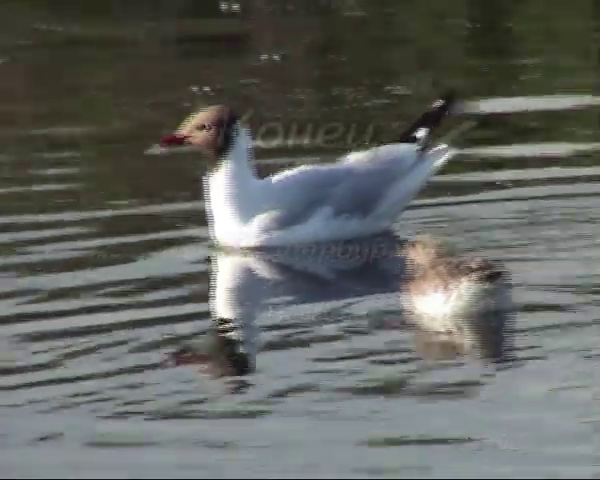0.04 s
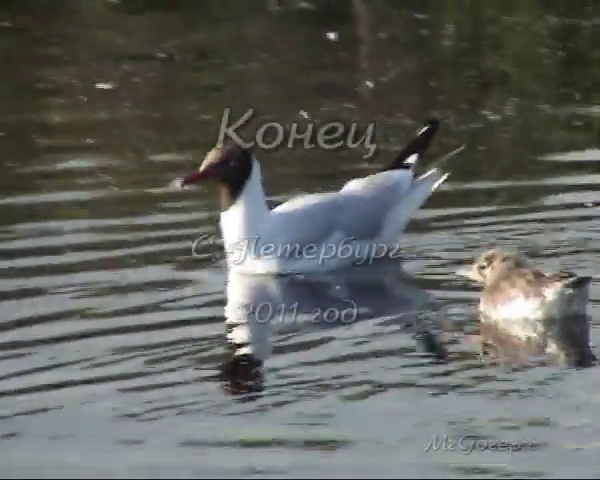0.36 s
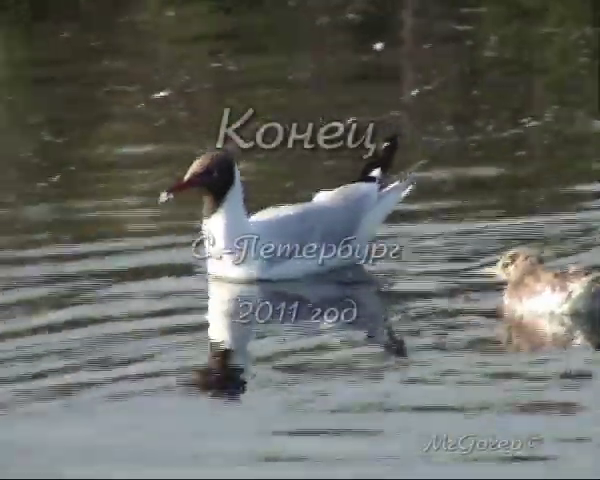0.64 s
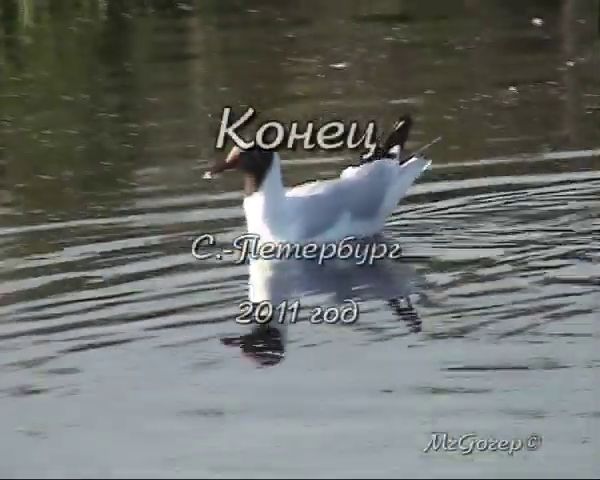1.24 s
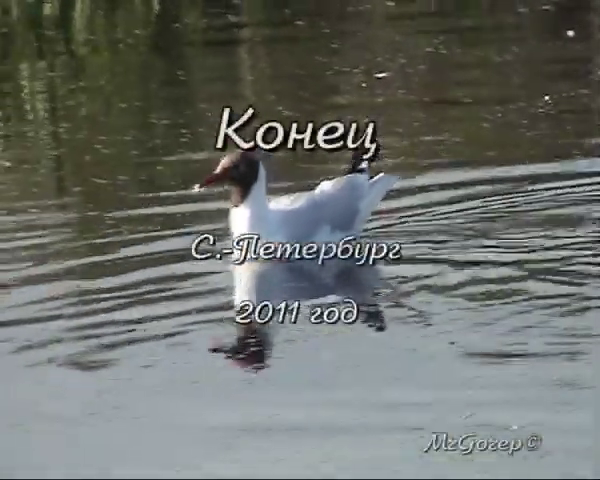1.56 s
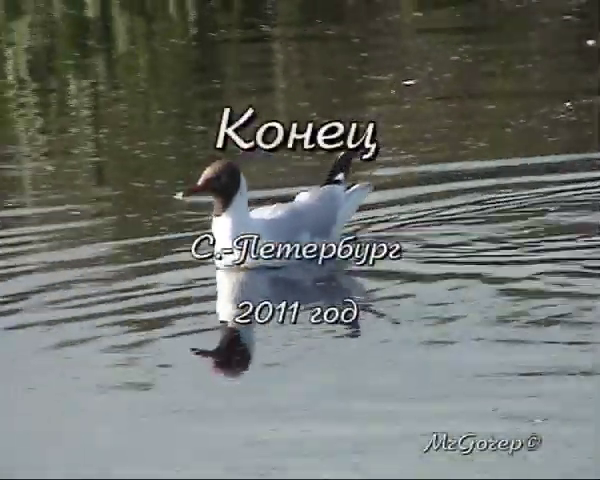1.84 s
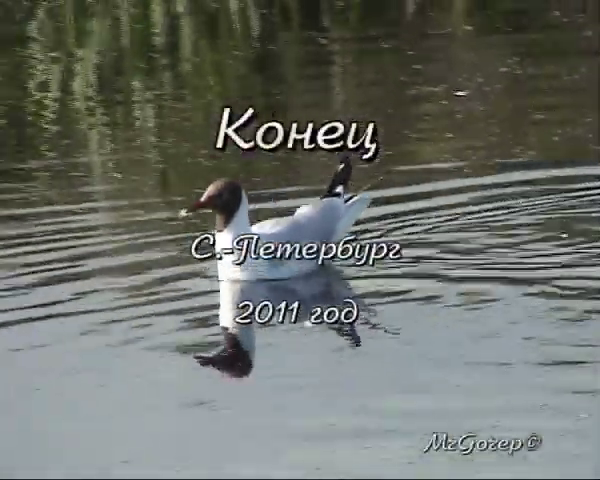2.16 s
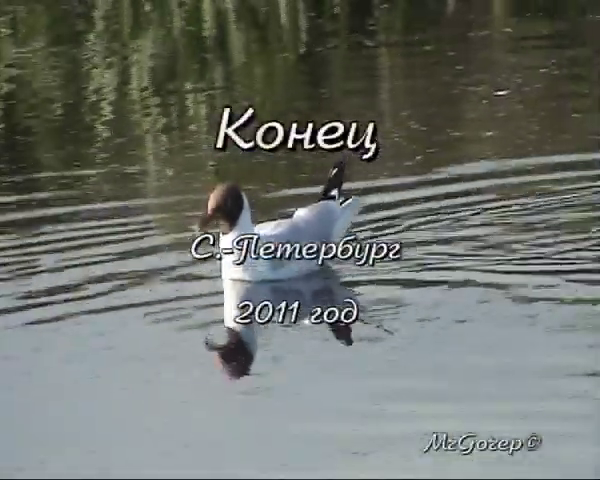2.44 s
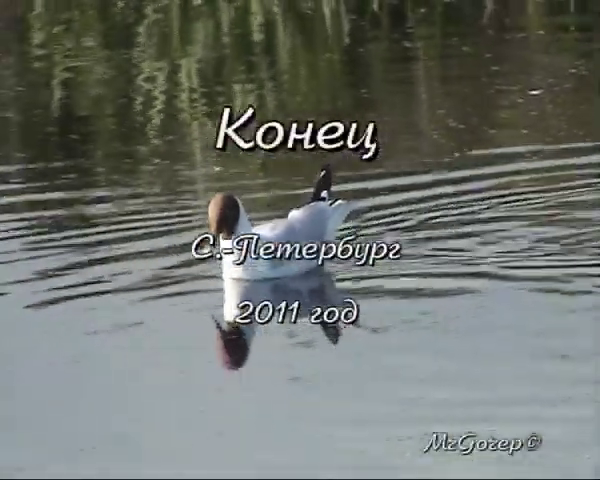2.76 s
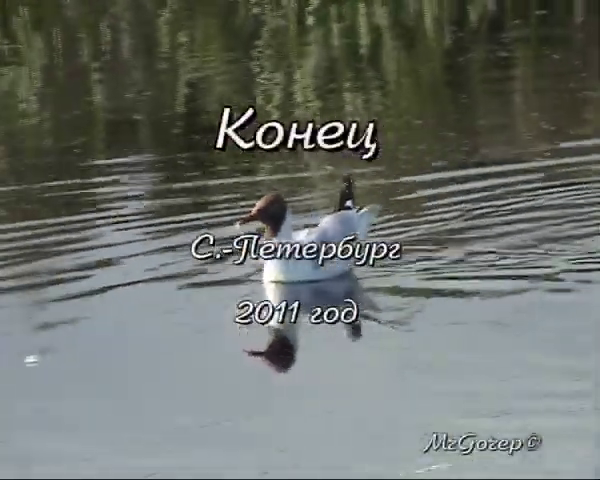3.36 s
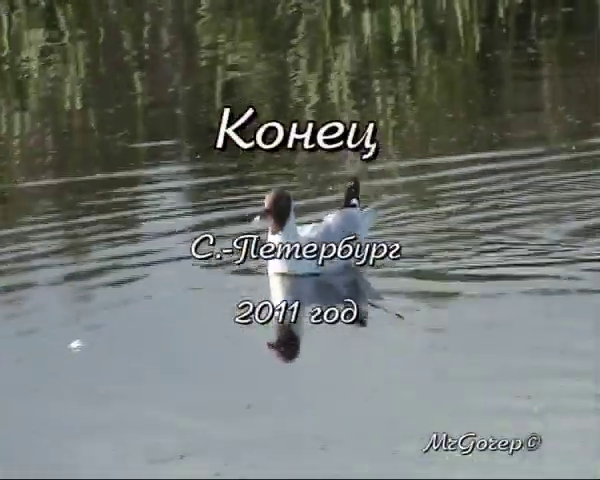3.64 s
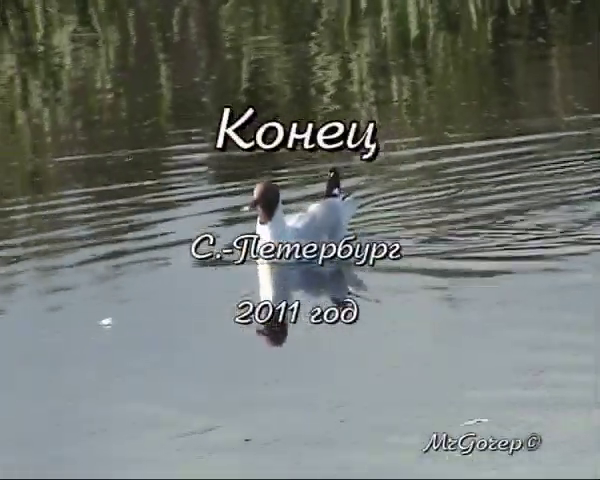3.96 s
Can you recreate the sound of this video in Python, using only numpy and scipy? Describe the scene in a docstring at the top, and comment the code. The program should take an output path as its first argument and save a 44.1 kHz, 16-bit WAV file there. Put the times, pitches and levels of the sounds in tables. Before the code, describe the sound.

Gull chicks whistle shrilly over and over while adult gulls give harsh, rattling cries.

```python
"""Gull chicks on a lake, close to a stereo microphone, beg again and again in shaky, nearly pure whistles.
Around them adults give rattling cries and yelps: harmonics and rasp, shaped by the throat and chopped
into fast beats. The calls echo off reeds and banks. Far behind lie the blur of a colony and a low rumble,
with a little splashing, thin hiss, a hum and the camera's whine; one sharp tick comes near the end."""
import sys
import numpy as np
from scipy import signal
from scipy.fft import rfft, irfft, next_fast_len
from scipy.io import wavfile
from scipy.ndimage import uniform_filter1d

SR = 44100
rng = np.random.default_rng(int(sys.argv[2]) if len(sys.argv) > 2 else 0)


def persist_wave(psi):
    """Save psi, clipped to +-1, as 16-bit WAV."""
    counts = np.round(np.clip(psi, -1, 1) * 32767).astype(np.int16)
    wavfile.write(sys.argv[1], SR, np.atleast_2d(counts).T)


N = 176400

# spectra of the distant colony, the rumble and the high hiss: (frequency [Hz], relative density [dB])
COLONY_SPECTRUM = [(180, -48), (300, -12), (476, -7.5), (667, -5), (737, -4.5), (825, -3), (1090, -4),
                   (1180, -2.5), (1500, 1.5), (1860, 1), (2380, -4), (3140, -8.5), (4450, -6), (5040, -8.5),
                   (5930, -17.5), (7710, -43), (13000, -120)]
RUMBLE_SPECTRUM = [(12, -50), (20, -21), (54, -3.5), (75, -0.5), (114, -0.5), (166, -10), (214, -7.5),
                   (296, -18.5), (400, -16.5), (520, -22), (880, -120)]
HISS_SPECTRUM = [(4000,-38),(5500,-10),(6800,-1.5),(8000,2),(9000,-6.5),(10500,-9),(13000,-23.5),(15500,-36)]
# how alike the ambience is at the two microphone ports: (frequency [Hz], coherence [0-1])
PORT_COHERENCE = [(60, 0.95), (110, 1), (220, 0.98), (420, 0.8), (790, 0.62), (1510, 0.3), (2880, 0.71),
                  (5480, 0.52)]
# the side the ambience leans to: (frequency [Hz], left minus right [dB])
PORT_BALANCE = [(60, -1), (110, -0.5), (220, 0.5), (420, 3), (790, -2.5), (1510, -2), (2880, -6.5),
                (5480, 0.0)]
# how far the left port leads: (frequency [Hz], phase [rad])
PORT_PHASE = [(0, 0), (600, -0.63), (860, 0.0017), (1550, -0.91), (2580, 0.82), (4050, -0.66), (5250, 0.7),
              (5680, 0.36)]
# thin whine of the camera: (frequency [Hz], level [dB])
CAMERA_WHINE = [(6223,-73),(7273,-75),(7727,-67),(8182,-75),(9900,-83)]

# adult cries, near and far: (time [s], length [s], rise [s], top pitch [Hz], end pitch [Hz], level [dB],
# rattle [beats/s], left minus right [dB], treble [dB], roughness [0-1])
NEAR_CRIES = [(-.08,0.12,0.078,882,690,-20.5,79,-1.5,5.5,0.3),(.655,0.25,0.056,1014,888,-26,83,-6.5,2,0.13),(1.745,0.27,0.039,1012,890,-26,76,-6,-2,.15),(2.255,0.32,0.093,1028,901,-26,87,2,-5.5,0.35),(2.89,.085,0.0304,1025,990,-27,67,-4,-15,.1),(3.065,.38,0.0196,1002,838,-25,68,3,-8,0.22),(3.965,.2,0.055,905,800,-26.5,68,3,-10,.1)]
FAR_CRIES = [(.05,0.16,0.044,861,797,-31,69.8,-6.5,2,0.78),(.67,0.33,0.031,852,765,-33.5,74.5,-13,3,.25),(1.04,0.15,0.077,936,915,-27.5,71.7,-2.5,5,0.68),(1.47,0.28,.03,820,768,-38,70,2,-2,0.2),(1.66,.12,0.08,930,915,-29,69.4,3.5,-16,0.78),(1.98,0.3,.04,793,738,-38.5,72.8,-10,5,0.33),(2.49,0.141,.05,873,830,-28.5,70.9,-1.5,3,0.83),(2.62,0.14,0.083,797,782,-33,70.8,-2,-12,0.25),(3.42,0.18,0.034,780,718,-35,70.3,4.5,-12,.3)]
# adult throats: plain, with a higher second resonance, with the bill wide open: (frequency [Hz], gain [dB])
THROAT = [(400,-27),(900,-23.5),(1300,-14),(1650,0),(1950,-0.5),(2350,-11.5),(3000,-13.5),(4000,-13),(5000,-21),(7500,-28.5),(12000,-73)]
FAR_THROAT = [(400,-24),(800,-15),(1200,-11.5),(1650,-2),(2000,1.5),(2420,-2),(3000,-16),(4000,-15.5),(5000,-20.5),(7500,-27.5),(12000,-55)]
YELP_THROAT = [(500,-21),(1050,-9.5),(1450,-7),(1850,2.5),(2100,1.5),(2500,-15),(3200,-14.5),(4500,-22),(6200,-13.5),(7600,-19.5),(9000,-31.5),(12000,-50)]
# splashes on the lake: (time [s], rise [s], time to fall 20 dB [s], level [dB])
SPLASHES = [(0,0.13,0.26,-35),(2.42,0.067,.15,-32.5),(3.25,.13,.18,-39.5)]
# spectrum of their spray: (frequency [Hz], gain [dB])
SPRAY_SPECTRUM = [(300,-45),(1500,-4),(3000,-5.5),(4800,3.5),(6200,-9),(8000,-6),(10000,-21),(13000,-32),(16000,-58)]
# one contour a call, for the nearest chick's begging and the other chicks' lower peeps:
# (time [s], pitch [Hz], relative level [dB])
BEG_CONTOURS = [
    [(0.1, 4165, -27.5), (0.124, 4826, -35), (0.14, 5253, -34), (0.162, 5172, -34), (0.24, 4970, -35),
     (0.244, 4952, -30), (0.266, 4872, -36)],
    [(0.745, 4247, -29), (0.777, 4704, -32), (0.805, 5353, -37), (0.819, 5328, -37), (0.851, 5161, -34),
     (0.857, 5095, -46), (0.871, 5080, -37), (0.945, 4860, -38.5), (0.965, 4700, -47)],
    [(1.5, 4040, -38), (1.524, 4400, -25), (1.534, 4551, -40), (1.544, 5130, -28), (1.578, 5300, -33),
     (1.6, 5348, -31.5), (1.676, 5000, -34.5), (1.698, 4838, -30), (1.712, 4753, -41), (1.722, 4380, -37),
     (1.76, 4130, -39.5)],
    [(2.2, 4203, -35), (2.208, 4298, -24), (2.22, 4446, -23.5), (2.232, 4927, -41), (2.24, 5209, -25.5),
     (2.255, 5350, -31), (2.28, 5410, -33), (2.288, 5180, -29.5), (2.45, 4616, -33), (2.455, 4578, -36)],
    [(2.99, 4085, -29), (3.012, 4447, -31), (3.038, 5207, -34), (3.08, 5470, -32.5), (3.088, 5230, -38),
     (3.102, 5182, -29), (3.142, 5082, -36.5), (3.216, 4785, -40), (3.255, 4599, -37)],
    [(3.695, 4519, -32), (3.725, 4861, -30), (3.735, 4972, -41), (3.773, 5347, -31), (3.821, 5161, -43),
     (3.827, 5167, -36), (3.915, 4918, -42), (3.935, 4858, -36), (3.99, 4670, -37)],
]
PEEP_CONTOURS = [
    [(0.28, 4305, -26.5), (0.29, 4270, -39), (0.294, 4417, -27), (0.318, 4600, -33.5), (0.352, 4500, -30),
     (0.372, 4215, -31), (0.4, 4100, -31)],
    [(0.512, 4210, -30), (0.516, 4160, -31), (0.536, 4510, -29), (0.554, 4680, -32.5), (0.63, 4760, -35),
     (0.69, 4683, -40)],
    [(0.99, 4042, -32), (1.012, 4520, -36), (1.032, 4380, -33), (1.064, 4520, -32), (1.108, 4440, -39),
     (1.132, 4150, -37), (1.16, 4068, -44)],
    [(1.868, 4480, -36), (1.88, 4330, -35), (1.93, 4700, -37), (1.95, 4560, -37), (1.978, 4220, -38),
     (2.0, 4150, -40)],
    [(2.02, 4235, -45), (2.032, 4338, -40), (2.054, 4830, -35), (2.074, 4880, -30), (2.1, 4867, -36),
     (2.115, 4720, -40)],
    [(2.755, 4183, -36), (2.775, 4425, -29.5), (2.801, 4423, -23.5), (2.819, 4610, -30),
     (2.857, 4578, -34.5), (2.897, 4200, -30), (2.915, 4040, -40)],
    [(3.535, 4069, -38), (3.557, 4450, -30), (3.577, 4280, -25.5), (3.595, 4500, -29), (3.639, 4430, -33),
     (3.667, 4090, -28), (3.69, 4050, -30), (3.706, 3620, -42)],
]
# chicks farther off: (time [s], length [s], top pitch [Hz], level [dB])
FAR_PEEPS = [(1.29,0.137,3920,-33.5),(1.305,.13,4850,-39),(1.405,0.068,5350,-41),(1.555,0.162,3420,-34),(2.117,0.22,4020,-39.5),(2.721,.2,4100,-36),(2.88,.125,4570,-36),(3.641,0.142,4620,-37),(3.7,.16,3880,-42),(0.607,0.042,3500,-34),(1.78,0.06,5900,-41),(.68,0.097,4170,-30.5),(1.76,0.2,4050,-34),(2.5,0.1,4400,-35),(2.9,.1,5500,-39),(3.25,0.0975,5150,-38),(1,.05,1800,-30),(.965,.055,3330,-33.5)]
# brief thin hisses: (time [s], length [s], level [dB])
SIZZLES = [(0.302,0.18,-49.5),(2.08,0.36,-46),(3.22,.25,-48)]
# their spectrum: (frequency [Hz], gain [dB])
SIZZLE_SPECTRUM = [(5000,-40),(7000,-12),(7850,2),(8600,-18),(10000,-15),(13000,-39)]
# adult yelps: (time [s], length [s], top pitch [Hz], level [dB], rattle [beats/s], left minus right [dB],
# treble [dB], second tone relative to the voice [dB], roughness [0-1])
YELPS = [(.437,0.19,1065,-23,67,-6,0.5,-9,0.24),(1.15,0.2,1075,-24.5,75,-5.5,1.5,-6.5,0.19),(2.955,.165,1040,-26,68,-5.5,3,-11,0.34),(3.628,0.2,1062,-27.5,70,-7,-3.5,-7.5,0.05)]
# faint low calls from across the lake: (time [s], length [s], top pitch [Hz], level [dB])
MOANS = [(1.67,0.27,809,-42),(2.251,0.29,767,-43.5),(2.88,0.26,715,-46),(3.504,0.2,756,-49)]
# ringing modes of the tick: (frequency [Hz], level [dB], time to fall 60 dB [s])
TICK_MODES = [(3710,-10,0.0095),(4430,-12,0.007),(7930,-9.5,.006),(8450,-26,0.0033)]

PORT_LAG_S_PER_DB, WHISTLE_EDGE_S = .000013, .007

def amp(db):
    """Decibels to gain."""
    return 10 ** (np.asarray(db) / 20)

def unit(x):
    """Scales to rms 1."""
    return x / np.sqrt(np.mean(x ** 2) + 1e-20)

def curve_at(points, hz):
    """Interpolates a curve on a log-frequency axis."""
    knots_hz, values = np.transpose(points)
    return np.interp(np.log(hz + 1), np.log(knots_hz + 1), values)

def colour(x, points, treble_db=0):
    """Filters by a spectrum and a treble shelf; the result has rms 1."""
    hz = np.fft.rfftfreq(len(x), 1 / SR)
    shelf_db = treble_db * np.clip((hz - 2300) / 2500, 0, 1)
    return unit(irfft(rfft(x) * amp(curve_at(points, hz) + shelf_db), len(x)))

def wander(size, hz):
    """Smooth random drift of rms 1, mostly slower than hz."""
    n = next_fast_len(size + 4096)
    rolloff = 1 + (np.fft.rfftfreq(n, 1 / SR) / hz) ** 4
    return unit(irfft(rfft(rng.standard_normal(n)) / rolloff, n))[:size]

def fade(t, edge_s):
    """Soft attack, hold, soft release."""
    return np.sin(np.pi / 2 * np.clip(np.minimum(t - t[0], t[-1] - t) / edge_s, 0, 1))

def place(mix, start, x, pan_db=0):
    """Places a sound; the nearer microphone port hears it louder and sooner."""
    for channel, side in zip(mix, (.5, -.5)):
        at = round((start - side * pan_db * PORT_LAG_S_PER_DB) * SR)
        part, heard = channel[max(at, 0):], x[max(-at, 0):]
        part[:len(heard)] += amp(side * pan_db) * heard[:len(part)]

def ambience(spectrum, db, patchy_db):
    """Steady noise with drifting patches, partly alike at the two microphone ports."""
    hz = np.fft.rfftfreq(2048, 1 / SR)
    a, b, c, d, patches = rng.standard_normal((N // 512 + 5, len(hz), 5)).T
    left, unrelated = a + 1j * b, c + 1j * d
    patches = unit(uniform_filter1d(uniform_filter1d(patches, size=9, axis=0), size=7, axis=1))
    coherence = curve_at(PORT_COHERENCE, hz)[:, None]
    lag = np.exp(-1j * np.interp(hz, *np.transpose(PORT_PHASE)))[:, None]
    right = (coherence * left + np.sqrt(1 - coherence ** 2) * unrelated) * lag
    lean = amp(curve_at(PORT_BALANCE, hz) / 2)[:, None]
    gain = amp(curve_at(spectrum, hz)[:, None] + patchy_db * patches)
    frames = np.array([left * lean, right / lean]) * gain
    return amp(db) * unit(signal.istft(frames, nperseg=2048, noverlap=1536)[1][:, :N])

def hum_and_whine(hum_hz=66.34, hum_db=-41.5):
    """A low hum and the camera's thin whine: steady sines, dead centre."""
    t = np.arange(N) / SR
    tones = [(hum_hz, hum_db), *CAMERA_WHINE]
    return sum(np.sqrt(2) * amp(db) * np.sin(2 * np.pi * (hz * t + rng.random())) for hz, db in tones)

def rattle(t, rate, bend, depth=.7):
    """The fast beats that chop an adult's voice: returns their gate and the pitch swing within each."""
    phase = 2 * np.pi * np.cumsum(rate * (1 + .063 * wander(len(t), 43))) / SR
    beats = 1 - depth + depth * (.5 + .5 * np.cos(phase)) ** .81
    gate = unit(beats * amp(1.1 * wander(len(t), 24))) * fade(t, edge_s=.0099)
    return gate, 1 + bend * np.sin(phase)

def voice(hz, rough, throat, treble_db):
    """Jittery harmonics and rasp through the resonances of the throat."""
    phase = 2 * np.pi * np.cumsum(hz * (1 + .006 * wander(len(hz), 220))) / SR
    tone = colour(sum(np.cos(k * phase) for k in range(1, 12)), throat, treble_db)
    rasp = colour(rng.standard_normal(len(hz)), throat, treble_db)
    return unit(np.sqrt(1 - rough) * tone + np.sqrt(rough) * rasp)

def cry(throat, length, rise, top_hz, end_hz, db, rate, pan_db, treble_db, rough):
    """An adult's cry and its pan: a hard start, pitch climbing quickly, then sagging ever faster."""
    t = np.arange(0, length, 1 / SR)
    climb = 1 - .17 * np.clip(1 - t / rise, 0, 1) ** 2
    sag = np.clip((t - rise) / max(length - rise, .01), 0, 1) ** 1.6
    hz = climb * (top_hz + (end_hz - top_hz) * sag)
    gate, swing = rattle(t, rate, bend=.022)
    effort_db = 2 * np.exp(-t / .024) - .5 * (t / length - .5)
    return amp(db + effort_db) * gate * voice(hz * swing, rough, throat, treble_db), pan_db

def adults(flock_per_s=7, flock_hz=802.4, flock_db=-40.5):
    """Adults near and far from the microphone, and a random flock beyond them."""
    out = np.zeros((2, N))
    groups = (NEAR_CRIES, cry, THROAT), (FAR_CRIES, cry, FAR_THROAT), (YELPS, yelp, YELP_THROAT)
    for calls, kind, throat in groups:
        for start, *call in calls:
            place(out, start, *kind(throat, *call))
    for start, *moan in MOANS:
        place(out, start, arched_whistle(*moan))
    flock = rng.uniform(-1, 1, (int(flock_per_s * N / SR), 5))
    for k, (when, length, pitch, level, pan) in enumerate(flock):
        hz = flock_hz + 130 * pitch
        call = cry(THROAT, .25 + .08 * length, rise=.07, top_hz=hz, end_hz=.88 * hz,
                   db=flock_db + 2 * level, rate=72.13, pan_db=4 * pan - 2, treble_db=0, rough=.35)
        place(out, (k + when / 2) / flock_per_s, *call)
    return out

def shore_echo(x, t60_s=.31):
    """Diffuse echo from the reeds and banks."""
    t = np.arange(SR) / SR
    tail = rng.standard_normal((2, SR)) * amp(-60 * t / t60_s) * np.minimum(t / .0055, 1)
    return signal.fftconvolve(x, tail / np.linalg.norm(tail[0]), axes=1)[:, :N]

def splashes():
    """Fine spray swells and dies away, just left of centre."""
    out = np.zeros((2, N))
    for start, rise, fall, db in SPLASHES:
        t = np.arange(0, rise + 2 * fall, 1 / SR)
        drops = rng.standard_normal(len(t)) * amp(2 * wander(len(t), 68))
        envelope = amp(db - 20 * (np.maximum(t - rise, 0) / fall) ** 1.9) * fade(t, rise)
        place(out, start, envelope * colour(drops, SPRAY_SPECTRUM), pan_db=1)
    return out

def whistle(t, hz, db, octave_db=-33):
    """A bird's nearly pure, slightly shaky tone with a faint octave."""
    phase = 2 * np.pi * np.cumsum(hz * (1 + .0033 * wander(len(t), 96))) / SR
    envelope = amp(db + .99 * wander(len(t), 70)) * fade(t, WHISTLE_EDGE_S)
    return np.sqrt(2) * envelope * (np.sin(phase) + amp(octave_db) * np.sin(2 * phase))

def arched_whistle(length, top_hz, db, arch=.08):
    """A distant, wavering call that rises and falls: a chick's peep or, pitched low, a moan."""
    t = np.arange(0, length, 1 / SR)
    droop = (2 * t / length - 1) ** 2
    hz = top_hz * (1 - arch * droop ** 1.5 + .008 * wander(len(t), 40))
    return whistle(t, hz, db - 6 * droop)

def chicks(crowd_per_s=12, crowd_hz=4600, crowd_db=-40.5):
    """Chicks whistling close to the microphone, others farther off, and a random crowd behind."""
    out = np.zeros((2, N))
    for calls, gain_db, octave_db, pan_db in (BEG_CONTOURS, 1, -26.5, .8), (PEEP_CONTOURS, 1.5, -33, .7):
        for call in calls:
            times, pitches, levels = np.transpose(call)
            t = np.arange(times[0] - WHISTLE_EDGE_S, times[-1] + WHISTLE_EDGE_S, 1 / SR)
            hz = uniform_filter1d(np.interp(t, times, pitches), size=300)
            db = uniform_filter1d(np.interp(t, times, levels), size=900) + gain_db
            place(out, t[0], whistle(t, hz, db, octave_db), pan_db)
    for start, *peep in FAR_PEEPS:
        place(out, start, arched_whistle(*peep))
    for when, length, pitch, level, pan in rng.uniform(-.91, 1, (int(crowd_per_s * N / SR), 5)):
        peep = arched_whistle(.13 + .0503 * length, crowd_hz + 600 * pitch, crowd_db + 3 * level, arch=.2)
        place(out, (when + 1) / 2 * N / SR, peep, pan_db=4 * pan)
    return out

def sizzles():
    """Soft, thin hisses come and go high in the treble."""
    out = np.zeros((2, N))
    for start, length, db in SIZZLES:
        t = np.arange(0, length, 1 / SR)
        hiss = colour(rng.standard_normal(len(t)), SIZZLE_SPECTRUM)
        place(out, start, amp(db) * fade(t, length / 3) * hiss)
    return out

def yelp(throat, length, top_hz, db, rate, pan_db, treble_db, ring_db, rough, ring_top_hz=2502):
    """An adult's yelp and its pan: a flat-topped arch of pitch; a higher tone rings in the middle."""
    t = np.arange(0, length, 1 / SR)
    droop = np.abs(2 * t / length - 1) ** 3.5
    gate, swing = rattle(t, rate, bend=.03)
    ring_hz = ring_top_hz * np.sqrt(swing) * (1 - .15 * droop) * (1 + .012 * wander(len(t), 220))
    ring = unit(np.sin(2 * np.pi * np.cumsum(ring_hz) / SR) * fade(t, length / 2) ** 2)
    voiced = voice(top_hz * swing * (1 - .2 * droop), rough, throat, treble_db)
    effort_db = (1 + 3.5 * t / length) * np.sqrt(droop)  # strong at both ends, most as it closes
    return amp(db) * gate * unit(amp(effort_db) * voiced + amp(ring_db) * ring), pan_db

def tick(start_s=3.7785, rise_s=.00015):
    """One dry, bright tick: four modes that die within milliseconds."""
    out, t = np.zeros((2, N)), np.arange(0, .02, 1 / SR)
    ring = sum(amp(db - 60 * t / t60) * np.sin(2 * np.pi * hz * t) for hz, db, t60 in TICK_MODES)
    place(out, start_s, np.minimum(t / rise_s, 1) * ring, pan_db=.8)
    return out

def scene():
    """The lake from the microphone: chicks almost dry, adults with more echo, the colony far behind."""
    colony = ambience(COLONY_SPECTRUM, db=-27.47, patchy_db=2.5)
    rumble = ambience(RUMBLE_SPECTRUM, db=-34.1, patchy_db=.47)
    hiss = ambience(HISS_SPECTRUM, db=-49.5, patchy_db=5.5)
    background = colony + rumble + hiss + hum_and_whine()
    cries, water, whistles = adults(), splashes(), chicks()
    direct = cries + water + whistles + sizzles() + tick()
    return background + direct + shore_echo(amp(-6.5) * cries + amp(-18) * whistles)

def record(dry):
    """The recorder's band limit: a steep low-pass at 15.4 kHz."""
    lowpass = signal.firwin(511, 15400, window=("kaiser", 9), fs=SR)
    return signal.oaconvolve(dry, lowpass[None], "same")


dry = scene()
out = record(dry)
persist_wave(out)
```